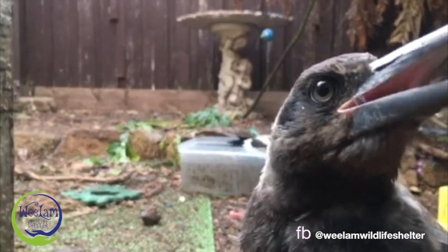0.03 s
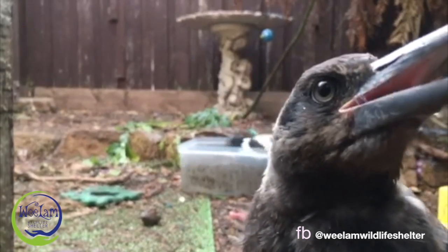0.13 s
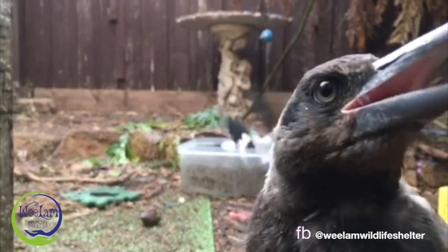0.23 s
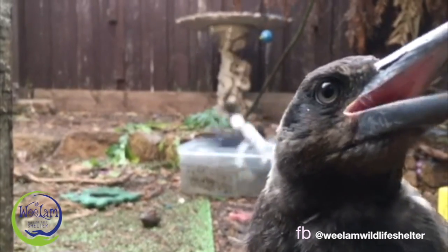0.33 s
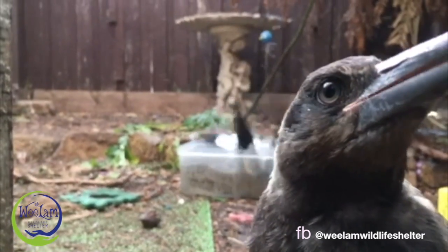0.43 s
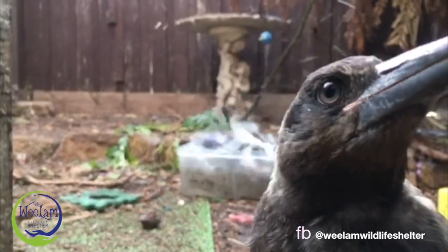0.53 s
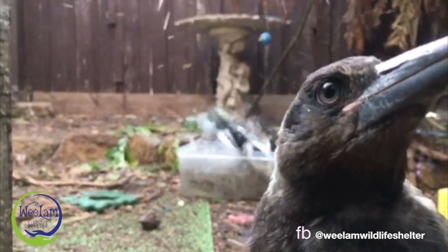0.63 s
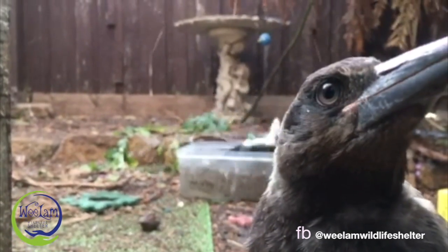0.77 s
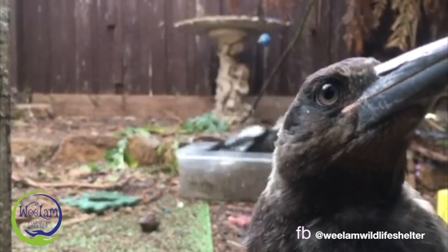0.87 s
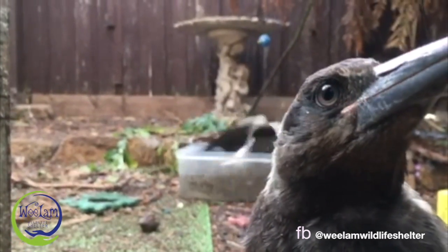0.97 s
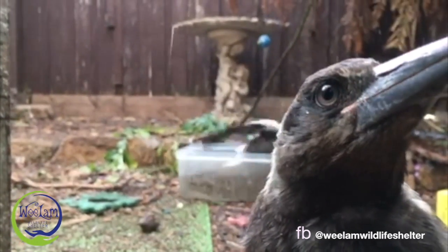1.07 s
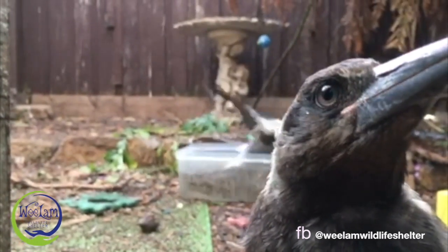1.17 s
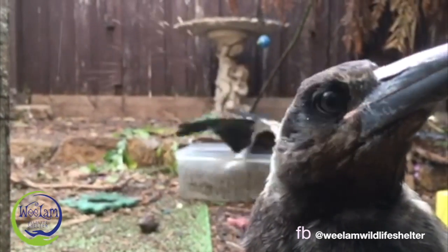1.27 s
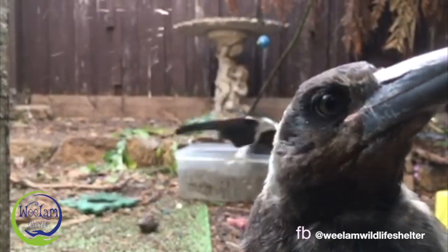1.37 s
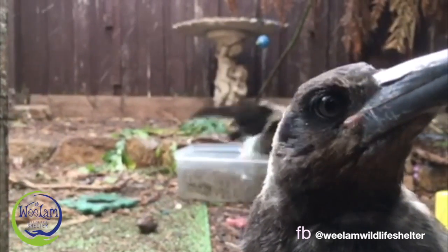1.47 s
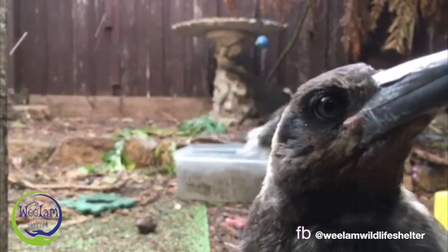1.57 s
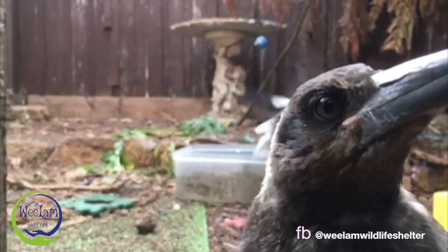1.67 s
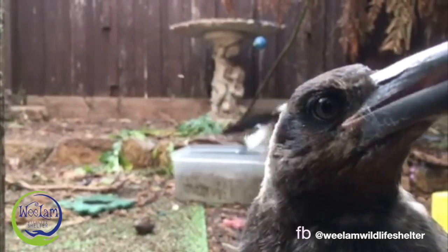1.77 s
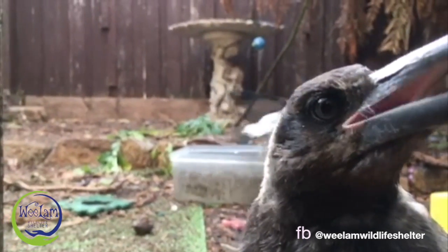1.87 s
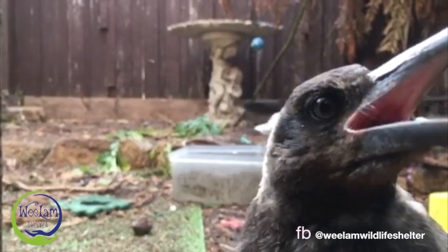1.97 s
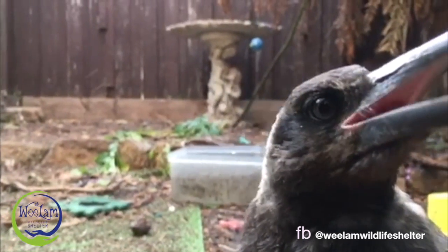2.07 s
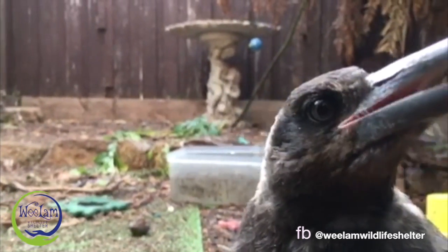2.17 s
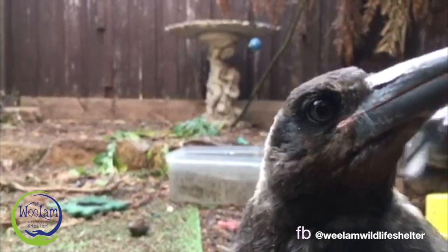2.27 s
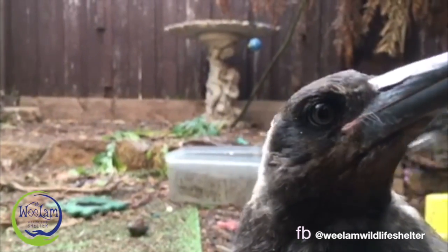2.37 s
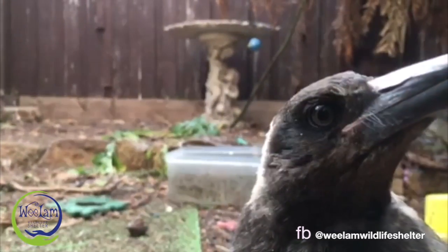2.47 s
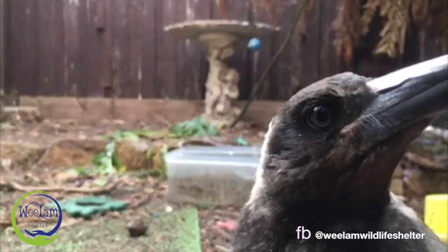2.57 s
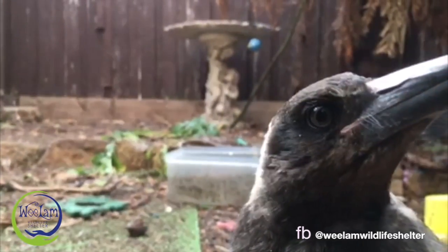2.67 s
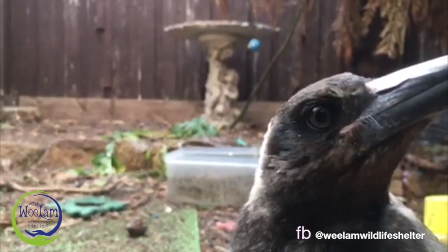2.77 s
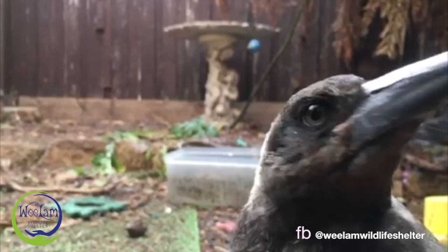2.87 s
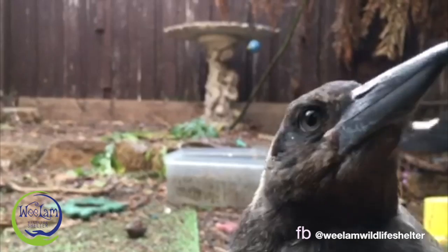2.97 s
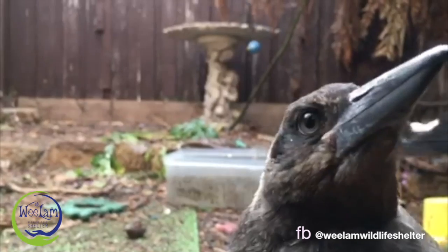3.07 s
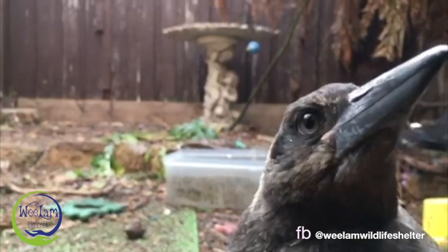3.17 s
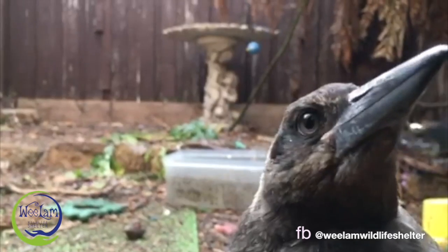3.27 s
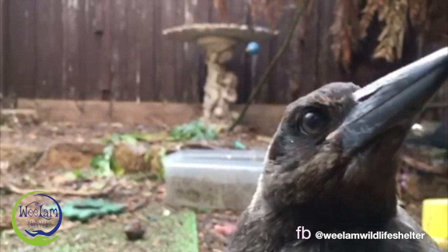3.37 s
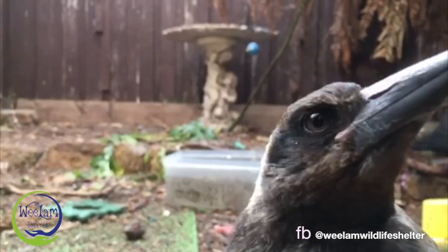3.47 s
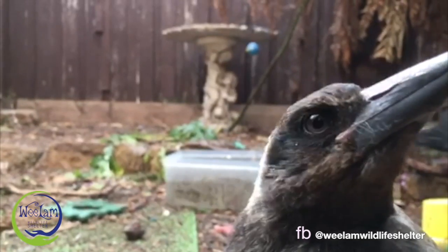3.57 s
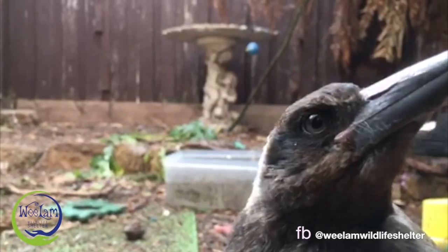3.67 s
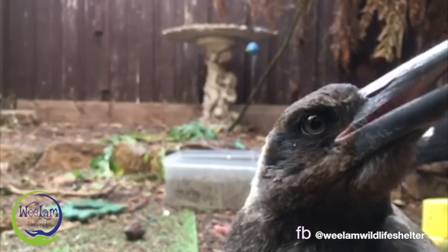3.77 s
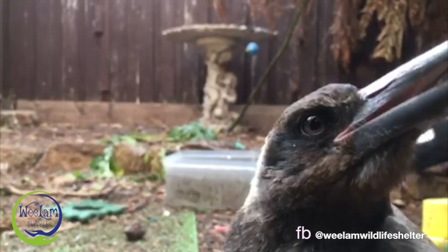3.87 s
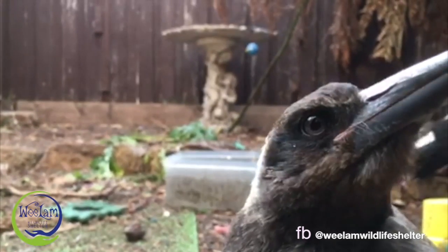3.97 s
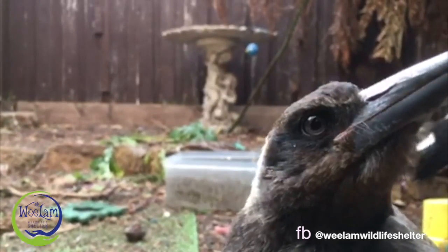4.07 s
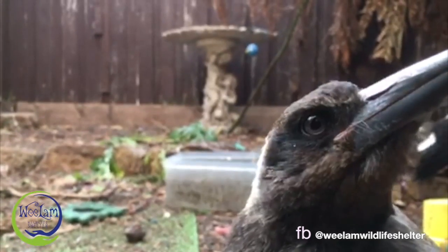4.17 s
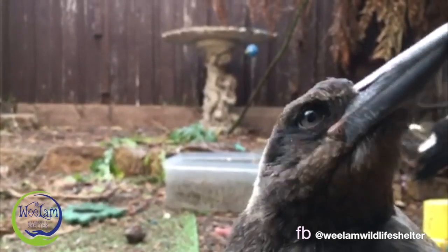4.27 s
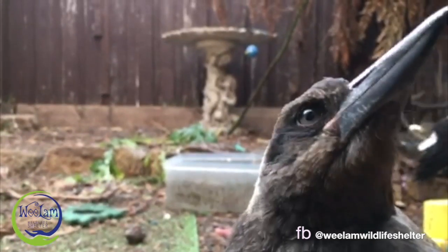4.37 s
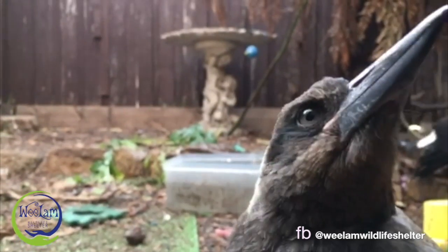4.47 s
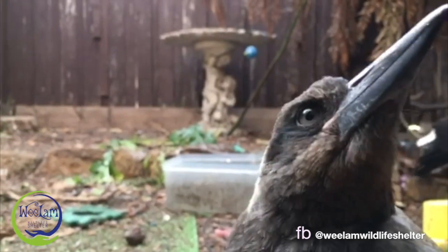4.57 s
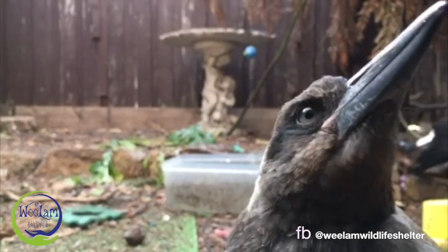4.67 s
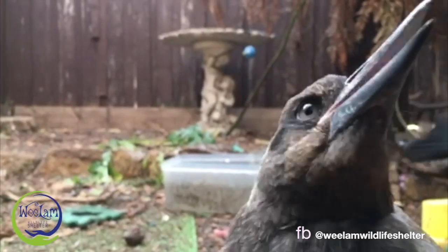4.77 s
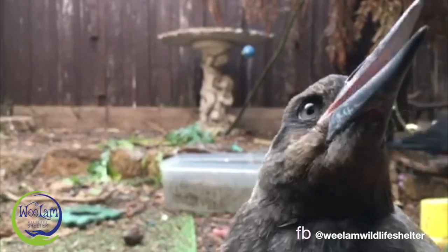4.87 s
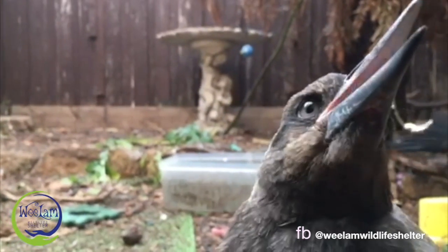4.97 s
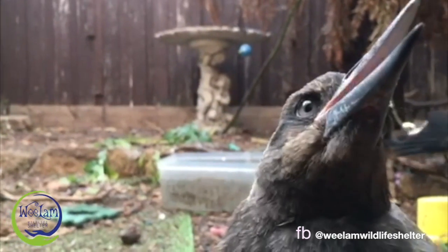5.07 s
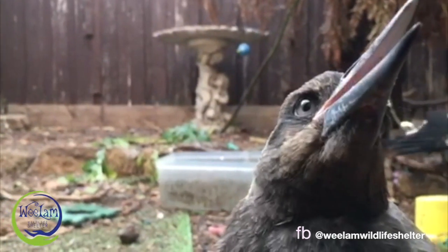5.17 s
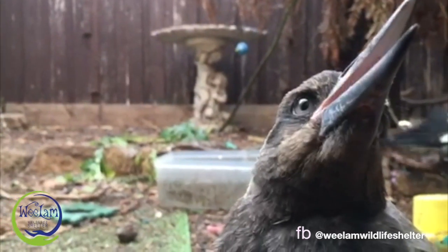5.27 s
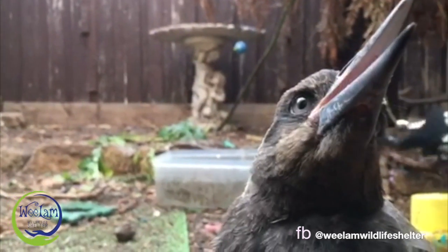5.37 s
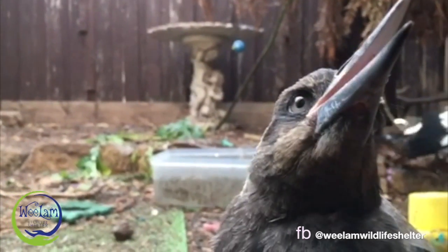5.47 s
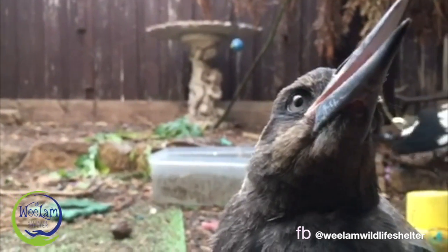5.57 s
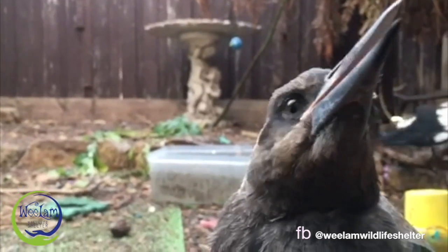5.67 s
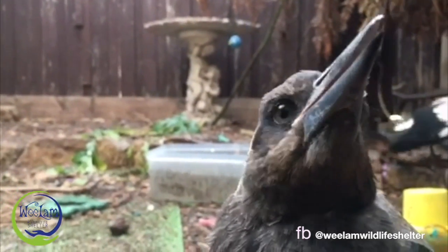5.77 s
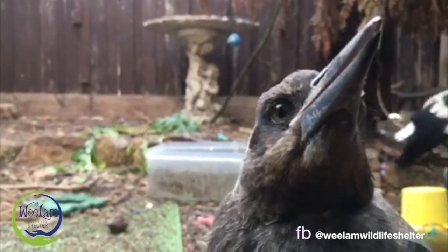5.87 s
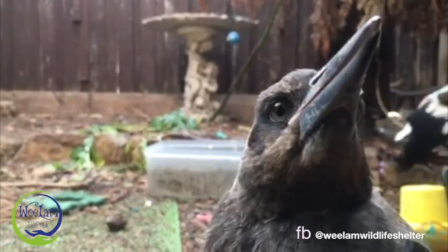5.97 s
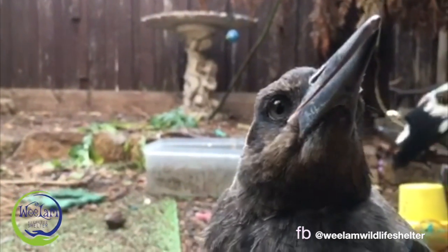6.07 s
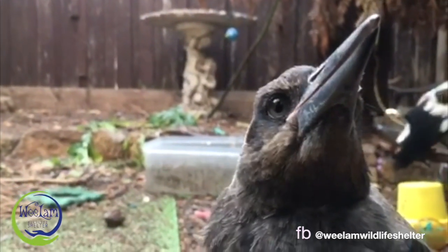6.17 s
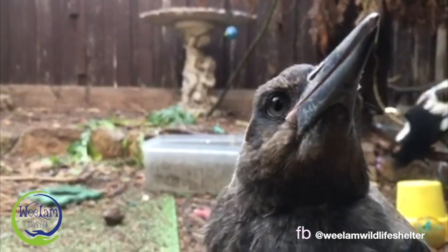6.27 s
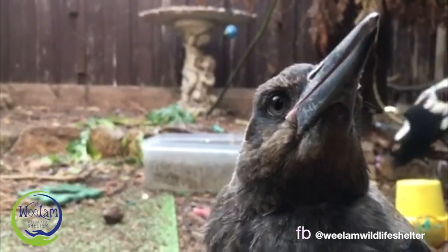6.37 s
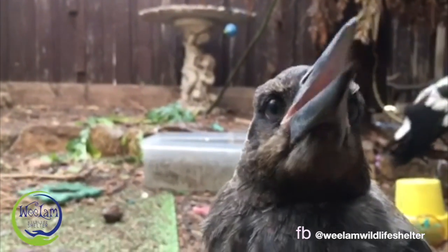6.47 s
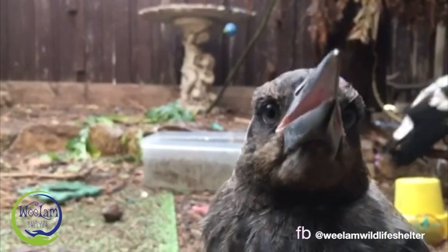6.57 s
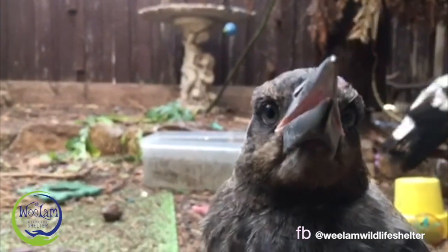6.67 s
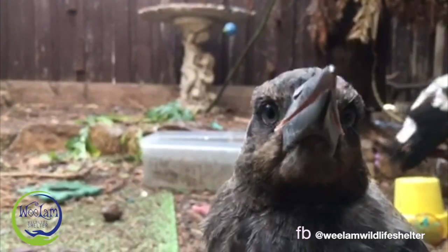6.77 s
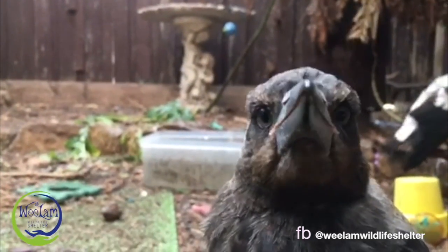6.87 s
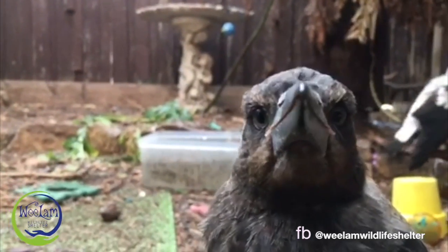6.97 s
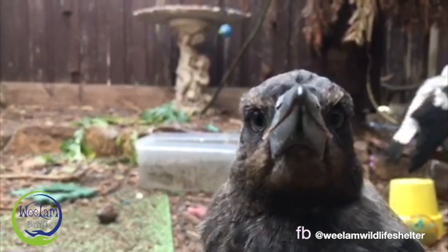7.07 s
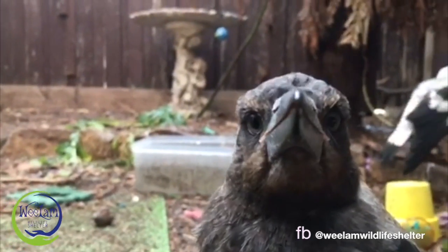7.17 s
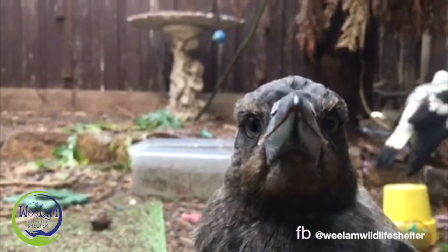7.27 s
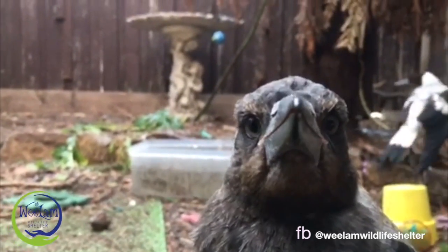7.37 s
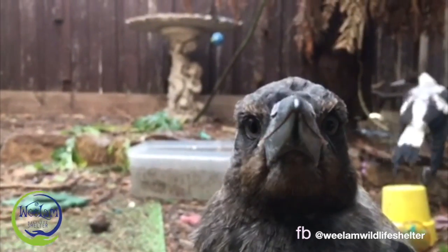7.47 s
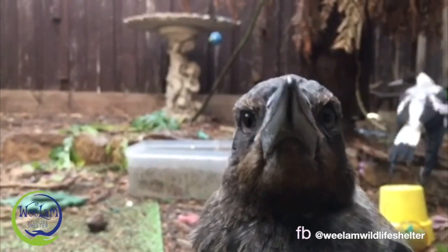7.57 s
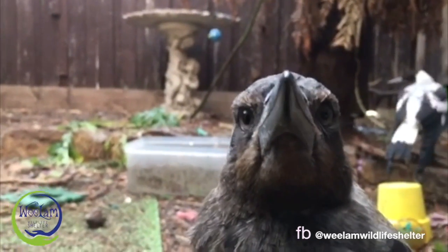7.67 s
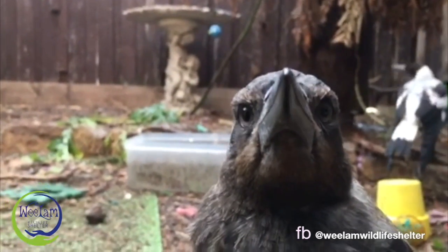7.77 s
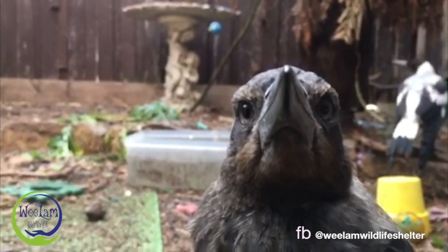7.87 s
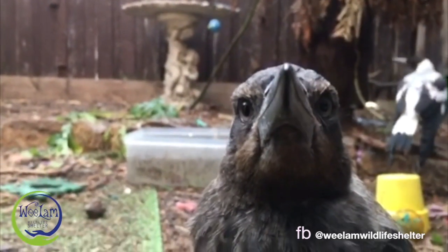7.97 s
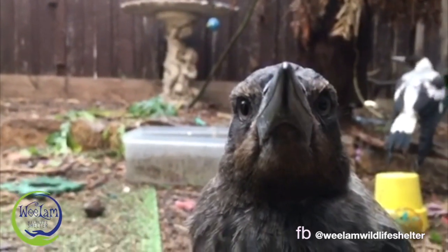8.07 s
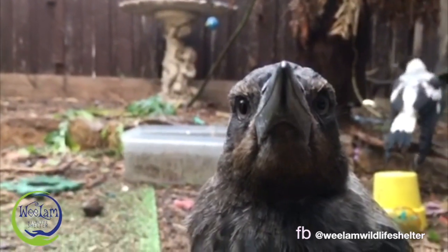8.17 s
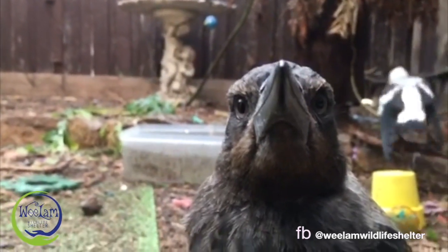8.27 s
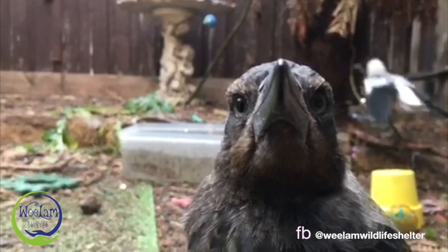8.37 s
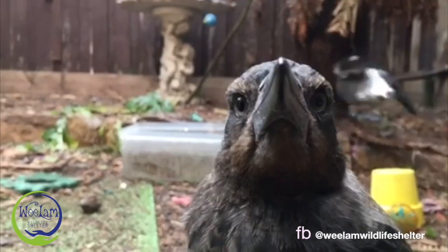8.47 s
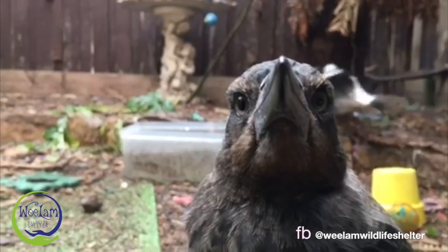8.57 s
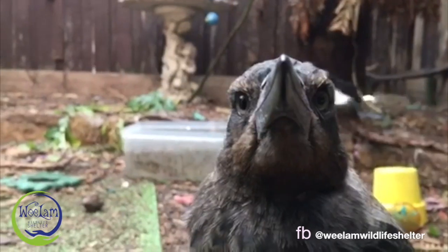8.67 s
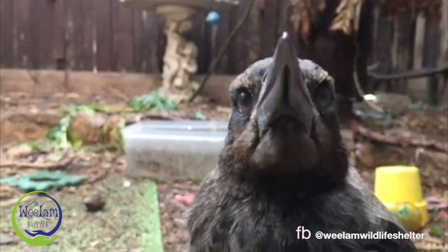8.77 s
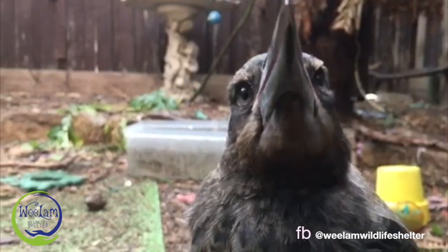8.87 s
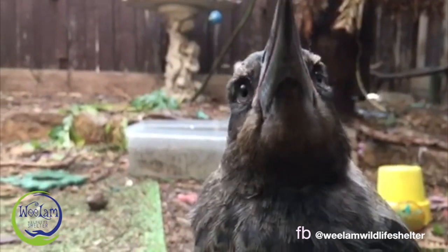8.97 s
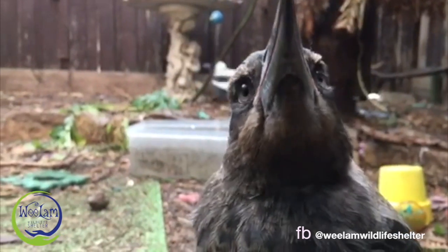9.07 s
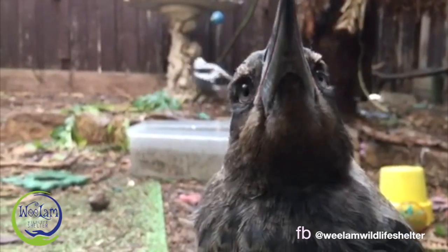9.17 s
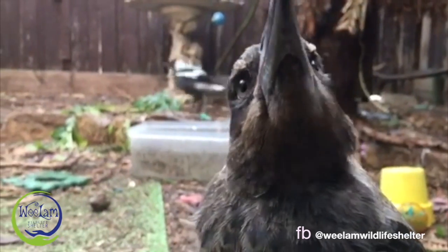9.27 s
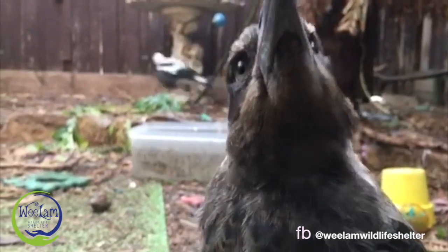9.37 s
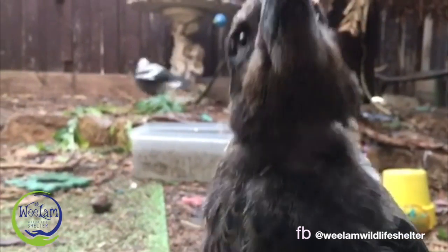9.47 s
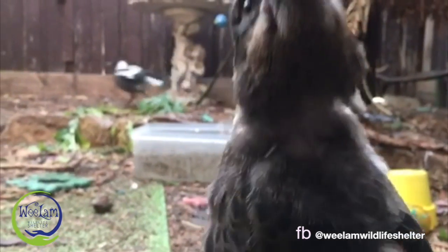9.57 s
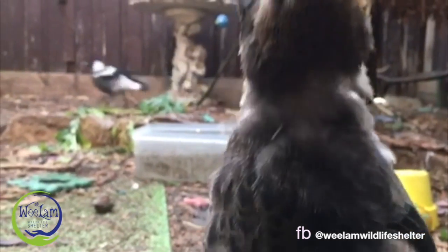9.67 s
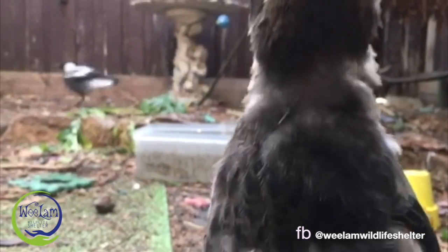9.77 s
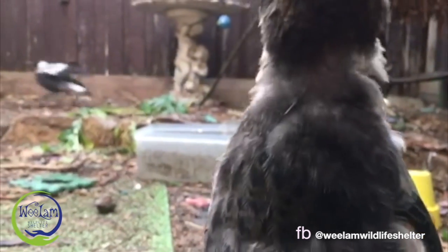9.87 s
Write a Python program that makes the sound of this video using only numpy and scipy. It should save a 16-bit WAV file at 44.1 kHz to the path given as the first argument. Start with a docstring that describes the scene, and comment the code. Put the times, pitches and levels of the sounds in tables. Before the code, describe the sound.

One close, mostly dry microphone outdoors: loud begging squawks from a young bird open the scene, followed by bubbling splashes and soft knocks from a tub a little way behind. The rest is sparse, with a few weaker or louder squawks, sharp tiny clicks, a brief feathery swish and a ground scuff. Small birds pip and whine farther off, very faint caws fall, and a low throbbing hum continues beneath.

```python
"""A back yard, one microphone: a young magpie begs close by in short nasal squawks, each starting with a rasp.
Behind it another magpie splashes in a plastic tub and hops about, with light clicks and rustles near by.
Farther off small birds pip, whine and screech, and faint caws fall, over a low throbbing hum and a thin hiss.
Calls are harmonics through throat resonances plus air hiss; water is swarms of ringing bubbles and drops;
knocks, clicks and rustles are damped rings and shaped noise. Distant sounds carry more of the yard's echo."""
import sys
import numpy as np
from scipy import signal
from scipy.fft import rfft, irfft, next_fast_len
from scipy.io import wavfile
from scipy.ndimage import map_coordinates

SR = 44100
rng = np.random.default_rng(int(sys.argv[2]) if len(sys.argv) > 2 else 0)


def dump(signal):
    """Clip the signal to [-1, 1] and save it as 16-bit WAV at the path in sys.argv[1]."""
    limited = np.clip(np.atleast_2d(signal).T, -1, 1)
    pcm = np.round(limited * 32767).astype(np.int16)
    wavfile.write(sys.argv[1], SR, pcm)


N = 437472
TOP_HZ = 15750  # the recorder's band limit

# Squawks close to the microphone, levels taken ahead of the throat: start_s, length_s, attack_s, level_db,
# sag_db, pitch_hz (at the crest), scoop (share of pitch), crest_s (after start), fall (share of pitch),
# knee (small = sudden fall), edge_db (overtones), dull_db (edge lost), rough (0-1), rasp_s,
# air_db (re level, before the rasp adds to it), throat_scale (ratio), second_db (2nd harmonic), tilt_db (per octave)
SQUAWKS = [ (-.002, .052, 0.001, -15.5, 8, 1361, .039, .017, 0.016, 0.23, 5.5, 0.8, .03, .008, -27, 1.098, 4, -10),
           (.037, 0.069, .008, -38.5, 3, 1560, .03, 0.033, 0.081, 0.73, 4.5, 16, 0.71, .055, -11, 1.19, 6, -20),
           (.299, .139, 0.015, -16, 18.5, 1283, .079, .039, 0.087, 0.54, 4, 11, 0.12, .02, -30, 1.037, -3, -3),
           (2.004, .103, 0.018, -29.5, 2, 863, .045, .058, .045, .25, 2, 10.5, 0.81, .062, -15.5, 0.93, 1.5, 1.5),
           (3.804, .15, 0.03, -31.5, 6.3, 1343, .28, .034, 0.072, 2.3, -17, 11, 0.65, 0.033, -22.5, 1.005, -3, -15),
           (4.755, .205, 0.16, -28, 14, 1186, 0.36, .08, 0.099, 1.05, -24.5, -4, 0.44, .058, -26, 0.996, -5.5, -17),
           (6.507, .254, 0.014, -20.5, 19.3, 1249, .131, .048, 0.22, 1.7, -2.5, 17.5, 0.031, .026, -32.5, 0.98, 3, 2.5),
           (8.831, .18, 0.016, -19.5, 16, 1213, .138, .034, 0.096, 0.32, -5, 29.5, 0.017, .03, -36.5, 1.004, -2.5, 2),
           ]
# Throat and open bill, notched above the first resonance; each squawk scales it: freq_hz, gain_db
THROAT = [(120, -50), (520, -16), (780, -0.5), (1300, 0.5), (1700, -1.5), (2300, -5.5), (2490, -23),
          (2950, -16), (3750, -4), (4900, -4), (6300, -14.5), (7500, -26), (8800, -15.5), (10500, -24),
          (12500, -29.5), (15500, -36.5)]
# Breath hiss of the squawk: freq_hz, level_db
SQUAWK_AIR = [(150, -50), (500, -24), (1200, -1.5), (2800, -11.5), (4600, 0), (7500, -15), (9400, 1.5),
              (11500, -12.5), (15500, -19.5)]
# Farther birds, levels ahead of the throat: start_s, length_s, level_db, rise (share spent swelling),
# pitch_hz (mid-note), fall (share of pitch), edge_db (overtones), rough (ratio), air_db (re level)
WHINES = [(1.44, 0.21, -61, 0.64, 2594, 0, -1, 1.1, -10.5),
          (1.498, 0.18, -54, .4, 3550, 0.28, -5, 0.22, -18.5),
          (1.598, 0.13, -53, 0.5, 2730, 0, -7, .12, -20),
          (1.763, 0.16, -58, 0.33, 2726, 0.1, 2, 0.31, -15.5),
          (4.172, .15, -62, 0.54, 2073, 0.27, 2.5, 0.54, -6),
          (4.279, 0.19, -56.5, 0.42, 2070, 0.02, 1, 0.05, -22),
          (5.279, .12, -66.5, 0.4, 2045, 0.03, 2, .4, -11),
          (5.37, .24, -58.5, 0.29, 2105, 0.06, -1, 0.14, -30),
          (5.357, 0.15, -51, 0.19, 1505, 0.1, -38, 0.89, -24),
          (6.737, .19, -52, 0.3, 2556, .02, -0.5, 0.03, -27),
          (8.365, 0.15, -66, 0.24, 1502, .14, 7.5, 0.1, -11),
          (8.371, .26, -57.5, 0.34, 2970, 0.25, 1.5, 1.1, -9),
          (8.569, 0.14, -61.5, 0.24, 2496, 0.1, -4.5, .35, -27)]
# Throat of the farther birds: freq_hz, gain_db
FAR_THROAT = [(200, -51), (600, -13.5), (1400, -6.5), (2000, -1.5), (3000, -5), (4200, -9), (6200, -18),
              (8300, -28), (11000, -44), (15000, -37.5)]
# Breath hiss of the farther birds: freq_hz, level_db
FAR_AIR = [(700, -21), (1600, -5), (3700, 10), (5500, -2), (8000, -12.5), (15000, -25.5)]
# A small bird's pips: start_s, pitch_hz (before arch and waver), level_db, length_s
PIPS = [(.218, 3810, -54.5, 0.073), (.85, 3754, -51.5, 0.042), (2.425, 3813, -55, 0.038),
        (3.218, 3786, -56, 0.035), (3.585, 3764, -52.5, 0.047), (4.032, 3872, -52, .06),
        (4.44, 3770, -56.5, 0.086), (5.072, 3874, -59.5, 0.088), (5.51, 3910, -53.5, 0.07),
        (5.885, 3844, -54, 0.065), (6.235, 3860, -52, 0.046), (7.225, 3830, -53.5, 0.058),
        (7.635, 3795, -56, 0.058), (7.975, 3820, -56.5, 0.053), (8.362, 3880, -53.5, 0.074)]
# Falling caws, very far off: start_s, pitch_hz (before arch, fall and waver), level_db (before the mix), length_s
CAWS = [(3.25, 776, -65, 0.22), (3.92, 671, -68.5, 0.14), (4.25, 663, -70.5, 0.4), (6.27, 750, -66, 0.14),
        (7.02, 769, -70.5, 0.25), (7.25, 696, -68, 0.238), (7.68, 666, -70.5, 0.25), (8.7, 673, -80, 0.24)]
# Wing beats in the tub, levels before the bath's trims: peak_s, slosh_db, spray_db, rise_s (60 dB), decay_s (60 dB)
SPLASHES = [(.578, -48.5, -53, 0.12, 0.36), (.626, -41, -58.5, .03, 0.34), (.7, -65, -55, 0.12, 0.32),
            (.838, -50, -53, 0.33, 0.17), (1.045, -53.5, -63, 0.088, 0.338),
            (1.314, -47, -65.5, 0.085, 0.26), (1.73, -56, -67, .25, 0.67)]
# Churned water in the tub, also the puff of a knock: freq_hz, level_db (per Hz)
SLOSH_COLOUR = [(120, -18), (200, -2.5), (343, -6.5), (446, -18.5), (624, -7), (765, -9.5), (1310, -8.5),
                (3500, -26.5), (4550, -66.5), (7700, -120)]
# Tinkling drops: freq_hz, level_db (per Hz)
SPRAY_COLOUR = [(1180, -17), (2000, -0.5), (2920, -12.5), (3840, 1), (5000, -5.5), (11700, -1),
                (15500, -18.5)]
# Plops and soft knocks at the tub and on the ground: start_s, level_db, resonance_hz
KNOCKS = [(0.534, -50, 1040), (0.571, -40.5, 1090), (0.623, -36, 608), (0.679, -41, 1340),
          (0.746, -50, 900), (0.828, -46.5, 503), (1.005, -43.5, 640), (1.234, -50, 1037),
          (1.259, -51, 1075), (1.314, -36.5, 886), (1.718, -38.5, 266), (1.868, -48, 460),
          (2.333, -51, 320), (5.426, -45.5, 1124), (6.764, -56, 250), (7.236, -50, 570.8),
          (7.459, -54.5, 251)]
# Sharp clicks of bill, claws and twigs, levels before trims: time_s, level_db, body_db (re crack)
CLICKS = [(0.6677, -44.5, -5.5), (0.7951, -43, 2), (0.9811, -47, -20), (1.282, -46, -5),
          (1.727, -32.5, -26), (2.1477, -54, -8), (2.187, -51, -31), (2.2122, -46, -31), (2.7056, -54, 1.5),
          (2.7467, -53, -3), (3.401, -53, -7), (3.424, -51.5, -5.5), (3.5829, -47.5, -2),
          (3.7569, -49.5, -5), (5.0639, -54, -3), (5.2722, -47.5, -6.5), (5.3641, -48.5, -10),
          (5.4323, -54, -2), (6.0372, -55, -16.5), (6.172, -60, -0.5), (6.3099, -56, -3),
          (7.0462, -51.5, -2), (7.2816, -53.5, -17), (8.517, -53, -14), (8.5858, -49.5, -19),
          (8.7286, -57.5, -15), (9.5199, -57.5, -11.5)]
# Crack of a click: freq_hz, level_db
CLICK_COLOUR = [(1500, -7), (3000, -2.5), (4800, -1), (7000, -2.5), (9500, -2.5), (12000, -8.5),
                (15500, -13)]
# Dry swishes of feathers and leaf litter: start_s, length_s, level_db, rise (share spent swelling)
SWISHES = [(2.695, 0.087, -58, 0.52), (2.72, 0.47, -60.5, 0.2), (3.12, 0.136, -67, 0.73)]
# Tone of the swishes: freq_hz, level_db (per Hz)
SWISH_COLOUR = [(470, -16.5), (800, -4), (1010, -5), (1490, -9.5), (2660, -8.5), (4010, -1), (4710, -11),
                (5400, -8.5), (15500, -28)]
# Duller scuffs on the ground: start_s, length_s, level_db, rise (share spent swelling)
SCUFFS = [(6.065, .055, -58, 0.57), (6.08, 0.15, -67.5, 0.31)]
# Tone of the scuffs: freq_hz, level_db (per Hz)
SCUFF_COLOUR = [(350, -33), (600, -2.5), (1400, -4.5), (1840, -9), (2650, -1.5), (9000, -26), (11700, -56),
                (19800, -120)]
# Far rumble: freq_hz, level_db (per Hz)
RUMBLE_COLOUR = [(13, -46), (22, -11.5), (34, -7.5), (54, 0.5), (99, -11), (119, -13), (179, -17),
                 (254, -21.5), (522, -34), (603, -30.5), (821, -34.5), (1010, -36), (2600, -49),
                 (3000, -50.5), (3900, -81.5), (6600, -120)]
# Hiss of the yard, the mist and the wash: freq_hz, level_db (per Hz)
HISS_COLOUR = [(590, -34), (1000, -7), (1200, -8.5), (1760, -6), (2370, -10.5), (3050, -8.5), (3580, -9),
               (6280, -13), (15600, -19)]
# Answer of fences and trees: freq_hz, t60_s
ECHO_T60 = [(200, 0.22), (3000, 0.6), (6000, 0.45), (14000, 0.079)]

# As the breath stops, the pitch drops (share) and the overtones go; a slow attack brings a slow end
RELEASE_S, RELEASE_PER_ATTACK, RELEASE_DROP, RELEASE_DULL_DB = .021, .5, .16, 11
# Extra air in the rasp of a squawk at LOUD_DB, its change per dB of level, and how quickly the rasp clears
RASP_HISS_DB, RASP_HISS_PER_DB, LOUD_DB, RASP_EDGE_S = 14, .8, -19.5, 0.0019
WEAK_ROUGH, WEAK_DB = 0.36, -49  # a weakening voice grows unsteady, half of it reached at WEAK_DB
AIR_FLANK = 1.8  # exponent below the tone's 2: the hiss opens sooner and closes later
MIST_DB, MIST_RISE_S, MIST_T60_S = -9, 0.61, 1.5  # level re spray, 60 dB rise and decay
HISS_DB = -77  # mean level of the yard's hiss
WASH_DB, WASH_HOLD_S, WASH_FADE_S = -52.5, .22, .1  # level re the squawk


def amp(db):
    """Decibels to gain."""
    return 10 ** (np.asarray(db) / 20)


def unit(x):
    """Scaled to rms 1."""
    return x / np.sqrt(np.mean(x ** 2) + 1e-20)


def along(points, hz):
    """(Hz, value) points read on a log axis."""
    f, v = np.transpose(points)
    return np.interp(np.log(hz + 1), np.log(f), v)


def wobble(rate, n):
    """A smooth random curve of n samples, rate knots a second."""
    knots = rng.standard_normal(int(n * rate / SR) + 4)
    return map_coordinates(knots, [np.arange(n) * rate / SR])


def filtered(x, response):
    """x times a response of frequency."""
    m = next_fast_len(len(x) + 8192)
    return irfft(rfft(x, m) * response(np.fft.rfftfreq(m, 1 / SR)), m)[:len(x)]


def coloured(x, spectrum):
    """x given a spectrum, at rms 1."""
    return unit(filtered(x, lambda hz: amp(along(spectrum, hz))))


def noise(spectrum, n):
    """Coloured noise of rms 1."""
    return coloured(rng.standard_normal(n), spectrum)


def resonated(x, spectrum):
    """x through a causal filter with the given gain, so that its resonances ring after each pulse."""
    m = 2 * next_fast_len(len(x) + 4096)
    log_gain = np.log(amp(along(spectrum, np.fft.rfftfreq(m, 1 / SR))))
    # folding the cepstrum onto positive time gives minimum phase
    cepstrum = irfft(log_gain, m)
    cepstrum[1:m // 2] *= 2
    cepstrum[m // 2 + 1:] = 0
    return irfft(rfft(x, m) * np.exp(rfft(cepstrum)), m)[:len(x)]


def ramp(t, length):
    """From 0 to 1 over the length, then held."""
    return np.clip(t / max(length, 1e-4), 0, 1)


def swell(length, rise):
    """Progress 0-1 through a sound, and a gain that swells over the share rise of it and then fades."""
    u = np.linspace(0, 1, int(length * SR))
    rise = np.clip(rise, .02, .98)
    return u, np.sin(np.pi / 2 * np.minimum(u / rise, (1 - u) / (1 - rise))) ** 2


def add(track, s, x):
    """Mix x into the track at time s."""
    part = track[max(round(s * SR), 0):][:len(x)]
    part += x[:len(part)]


def yard(hum_hz=48.0):
    """Far rumble, a low hum that throbs as two close tones beat, and a thin, slowly wavering hiss."""
    t = np.arange(N) / SR
    drift = 2 * np.pi * hum_hz * t + 0.63 * wobble(1.5, N)
    beat = 2 * np.pi * 2.7 * t + .5 * wobble(1.4, N)
    hum = amp(-58) * np.sin(drift) + amp(-59.0) * np.sin(drift + beat)
    rumble = amp(-53.5 + 0.88 * wobble(5.3, N)) * noise(RUMBLE_COLOUR, N)
    hiss = amp(HISS_DB + .8 * wobble(2, N) + 0.62 * wobble(16, N)) * noise(HISS_COLOUR, N)
    return hum + rumble + hiss


def voice(pitch, gain, edge_db, rough, air_gain, throat, air, jitter, shimmer, flutter_rate, doubling,
          edge_tilt=0, second_db=0, tilt_db=0):
    """One call: the syrinx's harmonics slide through fixed resonances, with air hiss pulsing on every cycle."""
    n = len(pitch)
    rough = np.clip(rough, 0, 1.5)
    # an unsteady membrane scatters period and strength, which smears the high harmonics most
    scatter = jitter * rough * wobble(flutter_rate, n) + .002 * wobble(91, n)
    phase = 2 * np.pi * np.cumsum(pitch * (1 + scatter)) / SR
    tone = np.zeros(n)
    for k in range(1, 19):
        hz = k * pitch
        # a harder closure lifts the overtones; each also wavers a little on its own
        octaves = np.log2(np.maximum(hz / 4500, 1))
        edge_share = np.clip((hz - 2400) / 1100, 0, 1) * (1 + edge_tilt * octaves)
        upper_db = edge_share * edge_db + tilt_db * octaves
        gain_db = (k == 2) * second_db + (k > 1) * (upper_db + 4.2 * wobble(70, n))
        tone += amp(gain_db) * (hz < TOP_HZ) * np.cos(k * phase + k * k / 2)
    # alternate cycles differ a little, giving weak lines halfway between the harmonics
    alternation = (rough + .07) * doubling * np.cos(phase / 2)
    tone *= 1 + rough * shimmer * wobble(flutter_rate, n) + alternation
    hiss = air_gain * unit(noise(air, n) * (1 + 0.44 * np.cos(phase)))
    return resonated(tone * gain, throat) + hiss


def magpie():
    """Each squawk starts with a rasp and scoops up to its crest; as the effort slackens it sinks and changes tone."""
    out = np.zeros(N)
    for (s, length, attack, db, sag_db, hz, scoop, crest, fall, knee, edge_db, dull_db,
         rough, rasp_s, air_db, scale, second_db, tilt_db) in SQUAWKS:
        t = np.arange(int(length * SR)) / SR
        release_s = RELEASE_S + RELEASE_PER_ATTACK * attack
        release = ramp(t - length + release_s, release_s)
        past = ramp(t - crest, length - crest)
        slack = (1 + knee ** 2) * past ** 2 / (past ** 2 + knee ** 2)
        pitch = hz * (1 - scoop * (1 - ramp(t, crest)) ** 2 - fall * slack - RELEASE_DROP * release ** 2)
        effort = amp(db - sag_db * slack)
        opening = np.abs(np.sin(np.pi / 2 * ramp(t, attack)) * np.cos(np.pi / 2 * release))
        gain = effort * opening ** 2
        edge = edge_db - dull_db * slack - RELEASE_DULL_DB * release
        rasp = .5 - .5 * np.tanh((t - rasp_s) / RASP_EDGE_S)
        roughness = rough * rasp + WEAK_ROUGH / (1 + gain / amp(WEAK_DB))
        rasp_db = RASP_HISS_DB + RASP_HISS_PER_DB * (db - LOUD_DB)
        air_gain = effort * opening ** AIR_FLANK * amp(air_db + rasp_db * rasp * opening ** 2)
        throat = [(f * scale, level) for f, level in THROAT]
        squawk = voice(pitch, gain, edge, roughness, air_gain, throat, SQUAWK_AIR, jitter=.06, shimmer=0.41,
                       flutter_rate=820, doubling=0.23, edge_tilt=.4, second_db=second_db, tilt_db=tilt_db)
        add(out, s, squawk)
    return out


def wash():
    """A faint hiss rises through each squawk, hangs on for a moment after it and fades."""
    t, gain = np.arange(N) / SR, np.zeros(N)
    for s, length, attack, db, *_ in SQUAWKS:
        fade = 1 - ramp(t - s - length - WASH_HOLD_S, WASH_FADE_S)
        gain = np.maximum(gain, amp(db + WASH_DB) * ramp(t - s, length) * fade)
    return gain * noise(HISS_COLOUR, N)


def echo(x):
    """The yard's diffuse answer: noise 10 ms late that dies at its own pace in each band."""
    hz, t, z = signal.stft(rng.standard_normal(SR // 2), SR, nperseg=256)
    decay = amp(-60 * t / along(ECHO_T60, hz)[:, None])
    tail = signal.istft(z * decay, SR, nperseg=256)[1]
    return signal.fftconvolve(x, np.pad(tail, (SR // 100, 0)) / np.linalg.norm(tail))[:N]


def whistles(table, arch, fall, waver, waver_rate, rise):
    """Nearly pure notes, pips or caws, that swell over the share rise of their length, bend in pitch and fade."""
    out = np.zeros(N)
    for s, hz, db, length in table:
        u, shape = swell(length, rise)
        pitch = hz * (1 - arch * (1 - u) ** 4 - fall * u + waver * wobble(waver_rate, len(u)))
        add(out, s, amp(db) * shape * np.sin(2 * np.pi * np.cumsum(pitch) / SR))
    return out


def bubbles(n, rate, centre_hz, spread, cycles, size_db):
    """A swarm of damped rings of uneven size that start softly and rise a little in pitch, rms 1."""
    count = int(rate * n / SR)
    when, size, chance = rng.random((count, 3)).T
    hz = np.clip(centre_hz * np.exp(spread * (2 * chance - 1)), 100, TOP_HZ)[:, None]
    t = np.arange(SR // 40) / SR
    age = hz * t / cycles
    envelope = np.exp(-age) * (1 - np.exp(-8 * age))
    rings = np.sin(2 * np.pi * hz * t * (1 + .03 * np.minimum(age, 4))) * envelope
    rings *= amp(-size_db * np.log(1 - .98 * size))[:, None]  # a few rings are much the loudest
    index = (when * n).astype(int)[:, None] + np.arange(len(t))
    return unit(np.bincount(index.ravel(), rings.ravel(), n)[:n])


def bath(slosh_db=-4.0, spray_db=-2):
    """Each wing beat churns the tub: bubbles in the slosh, a tinkling spray of drops and a lingering mist."""
    n = 3 * SR  # the bathing falls within the first three seconds
    s, low_db, high_db, rise, t60 = np.transpose(SPLASHES)[:, :, None]
    age = np.arange(n) / SR - s

    def beats(db, up, down):
        """All beats summed in power, each rising to its peak and dying away."""
        return np.linalg.norm(amp(db - 60 * np.maximum(-age / up, age / down)), axis=0)

    slosh = coloured(bubbles(n, rate=450, centre_hz=1200, spread=1.2, cycles=5, size_db=4.5), SLOSH_COLOUR)
    spray = coloured(bubbles(n, rate=1300, centre_hz=5500, spread=1, cycles=7, size_db=5.5), SPRAY_COLOUR)
    water = beats(low_db + slosh_db, rise, t60) * slosh + beats(high_db + spray_db, rise, t60) * spray
    # fine drops thrown up by the beats patter down for longer
    mist = beats(high_db + MIST_DB, MIST_RISE_S, MIST_T60_S) * noise(HISS_COLOUR, n)
    return np.pad(water + mist, (0, N - n))


def knocks(puff_db=-7):
    """Each soft blow rings one damped resonance over a dull puff of noise."""
    out, t = np.zeros(N), np.arange(SR // 6) / SR
    for s, db, hz in KNOCKS:
        ring = np.sin(2 * np.pi * hz * t) * amp(-60 * t / 0.049)
        puff = noise(SLOSH_COLOUR, len(t)) * amp(puff_db - 60 * t / 0.07)
        add(out, s, amp(db) * (ring + puff) * (1 - np.exp(-t / 0.0012)))
    return out


def clicks():
    """A bright crack with a short scuff after it and a little woody body."""
    body_colour = [(300, -15.5), (1300, 6), (2500, -5.5), (5000, -24.0)]  # freq_hz, level_db
    out, t = np.zeros(N), np.arange(SR // 6) / SR
    for s, db, body_db in CLICKS:
        crack = noise(CLICK_COLOUR, len(t)) * (amp(-60 * t / 0.013) + amp(-12.0 - 60 * t / .16))
        body = noise(body_colour, len(t)) * amp(-60 * t / 0.036)
        add(out, s - .001, amp(db - 6.5) * (crack + amp(body_db + 4) * body))
    return out


def whiners():
    """Farther birds: sliding whines and broken screeches, made rougher by an unsteadier membrane."""
    out = np.zeros(N)
    for s, length, db, rise, hz, fall, edge_db, rough, air_db in WHINES:
        u, shape = swell(length, rise)
        pitch = hz * (1 - fall * (u - .5))
        call = voice(pitch, amp(db) * shape, edge_db, rough, amp(db + air_db) * shape, FAR_THROAT, FAR_AIR,
                     jitter=.05, shimmer=.7, flutter_rate=170, doubling=.7)
        add(out, s, call)
    return out


def rustle(strokes, colour, grain_db):
    """Dry, finely grained strokes of noise that swell and fade."""
    out = np.zeros(N)
    for s, length, db, rise in strokes:
        u, shape = swell(length, rise)
        grain = amp(grain_db * wobble(300, len(u)))
        add(out, s, amp(db) * shape * unit(noise(colour, len(u)) * grain))
    return out


def scene():
    """The near bird is almost dry; the farther a sound, the more of the yard it carries."""
    near = magpie() + clicks()
    swishes = rustle(SWISHES, SWISH_COLOUR, grain_db=2.0)
    scuffs = rustle(SCUFFS, SCUFF_COLOUR, grain_db=7)
    middle = bath() + knocks() + swishes + scuffs
    pips = whistles(PIPS, arch=.04, fall=0, waver=.009, waver_rate=400, rise=.33)
    far = whiners() + pips
    farthest = whistles(CAWS, arch=0.065, fall=0.1563, waver=0.048, waver_rate=110, rise=0.2)
    wet = echo(amp(-43) * near + amp(-12.5) * middle + amp(-11.0) * far + amp(-2.5) * farthest)
    return (near + middle + far + amp(-2.0) * farthest + wet + wash() + yard())[None]


def record(dry):
    """The microphone sheds the deepest bass, below 33 Hz; nothing is kept above the recorder's band limit."""
    return filtered(dry[0], lambda hz: (hz < TOP_HZ) * hz ** 5 / np.hypot(hz ** 5, 33 ** 5.))[None]


dry = scene()
out = record(dry)
dump(out)
```